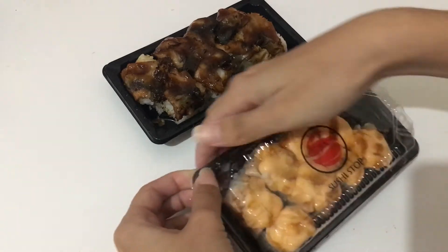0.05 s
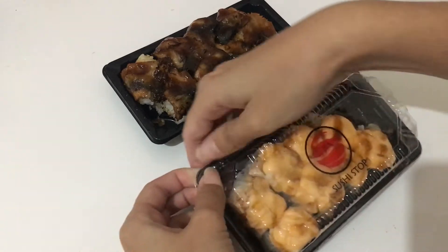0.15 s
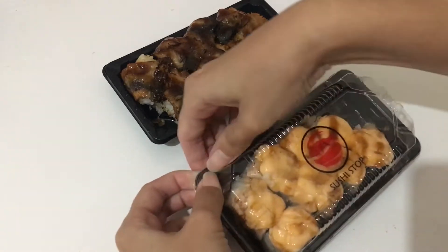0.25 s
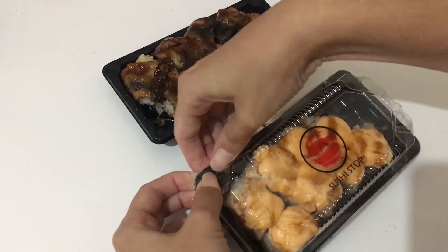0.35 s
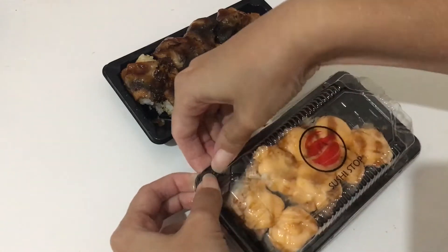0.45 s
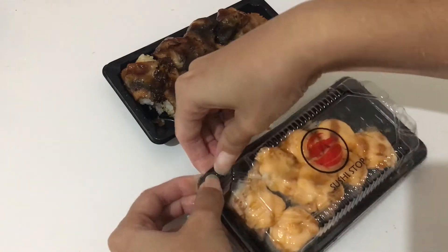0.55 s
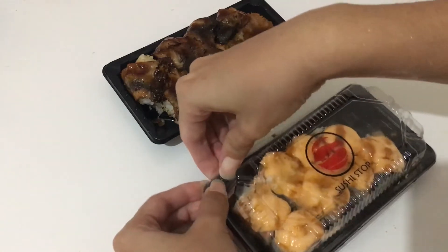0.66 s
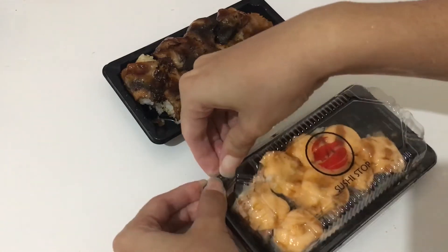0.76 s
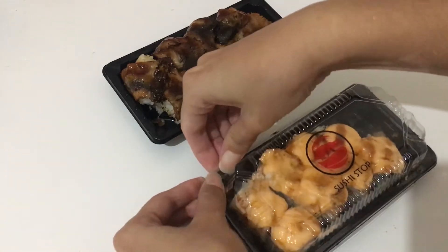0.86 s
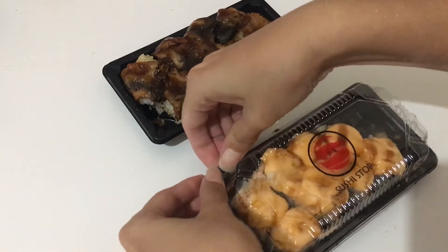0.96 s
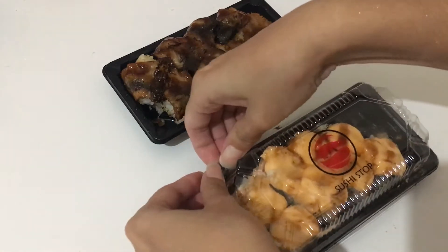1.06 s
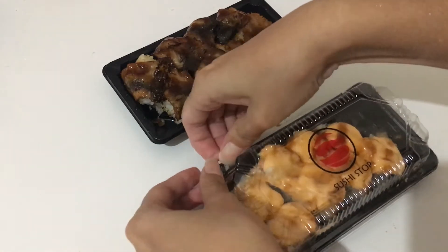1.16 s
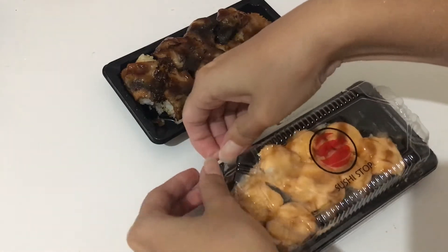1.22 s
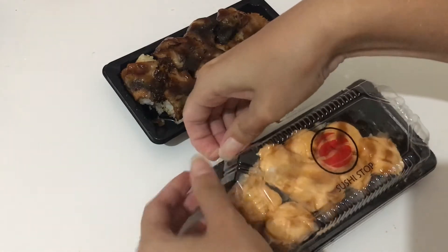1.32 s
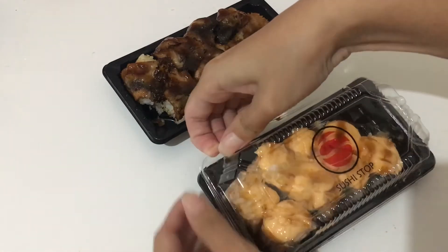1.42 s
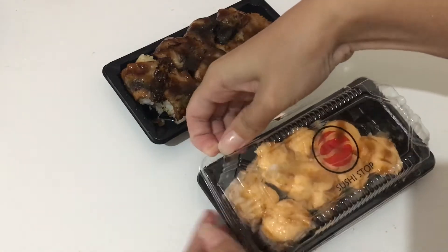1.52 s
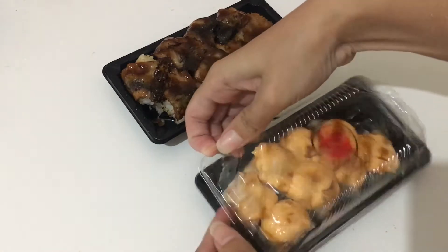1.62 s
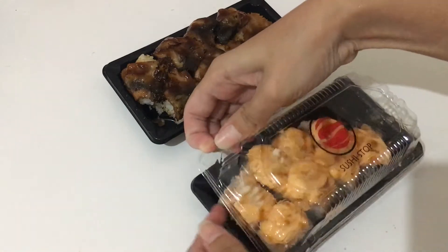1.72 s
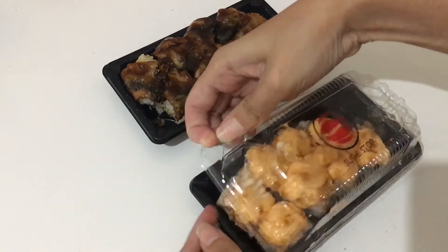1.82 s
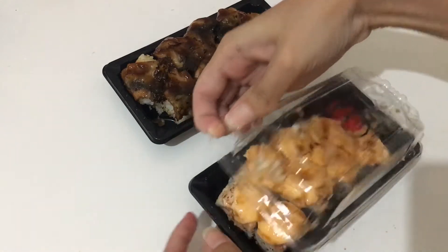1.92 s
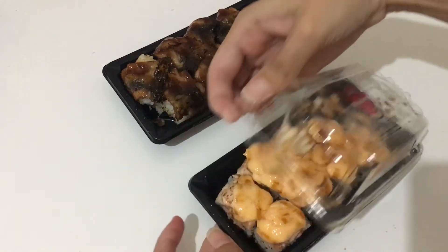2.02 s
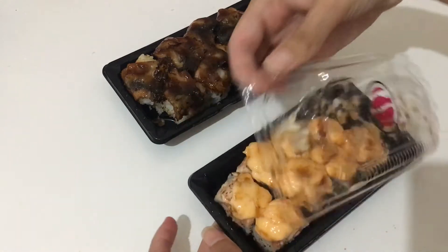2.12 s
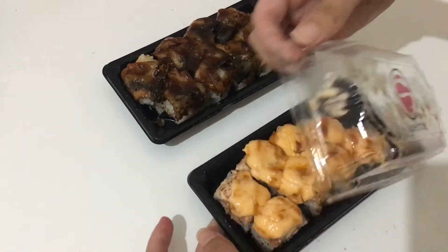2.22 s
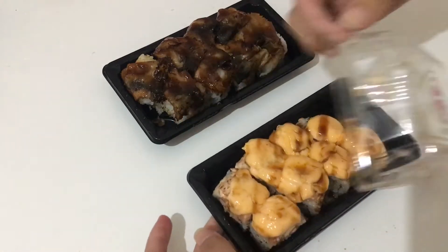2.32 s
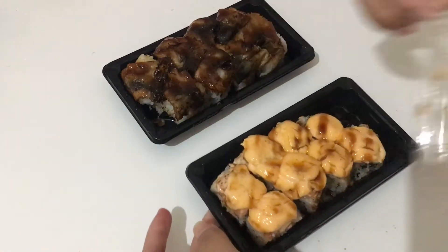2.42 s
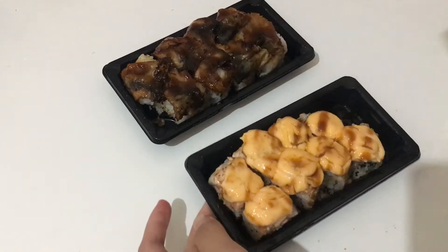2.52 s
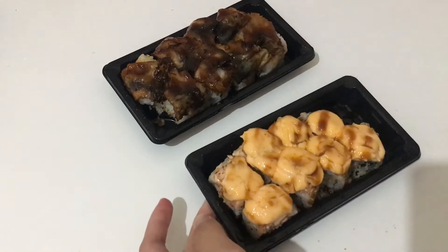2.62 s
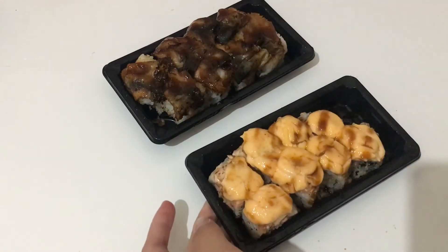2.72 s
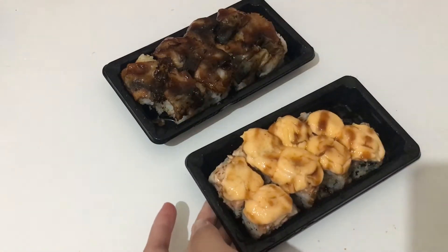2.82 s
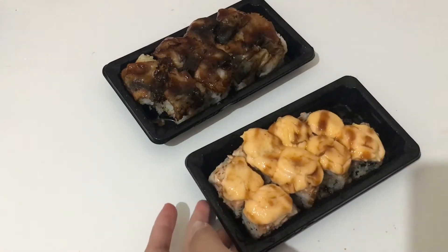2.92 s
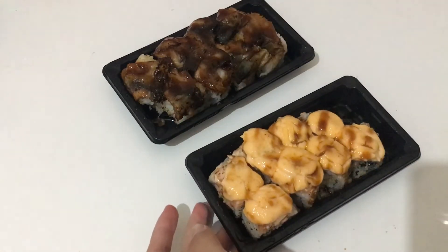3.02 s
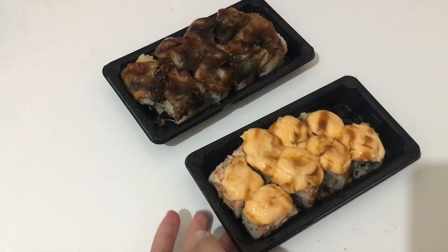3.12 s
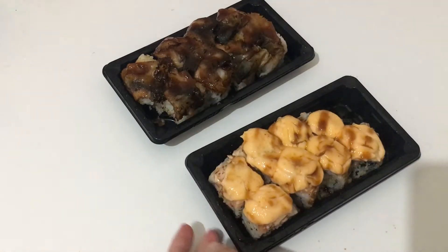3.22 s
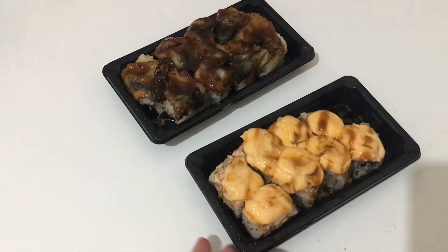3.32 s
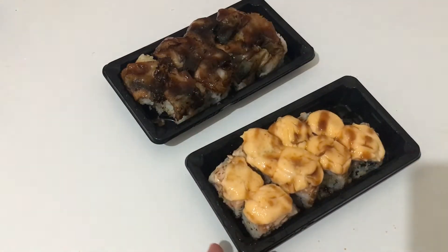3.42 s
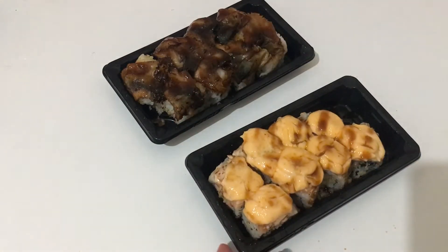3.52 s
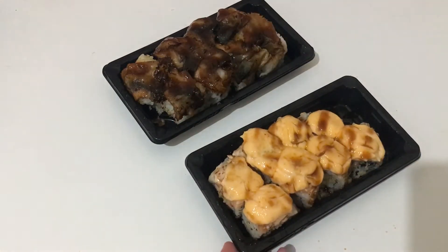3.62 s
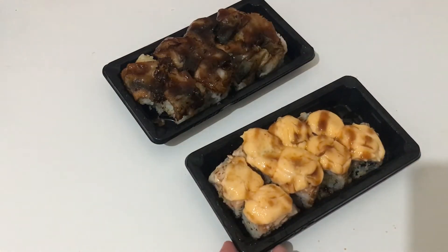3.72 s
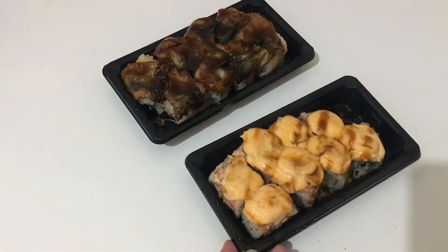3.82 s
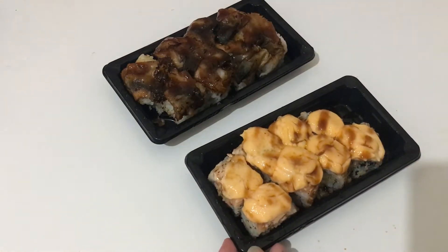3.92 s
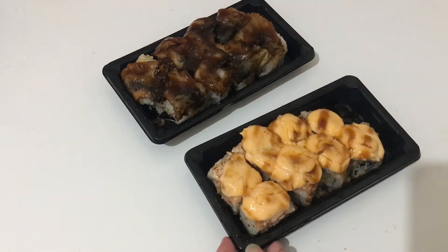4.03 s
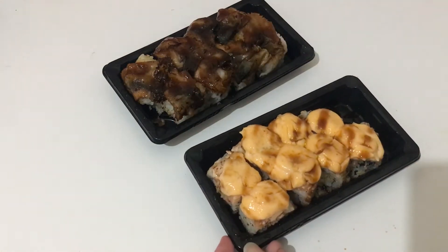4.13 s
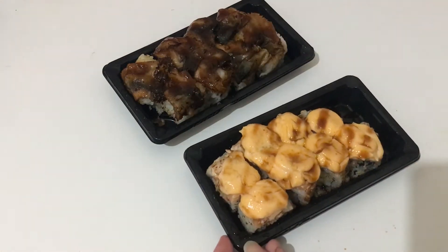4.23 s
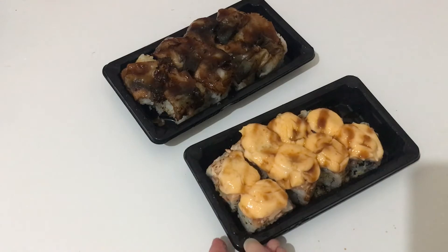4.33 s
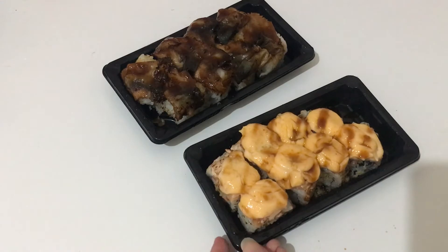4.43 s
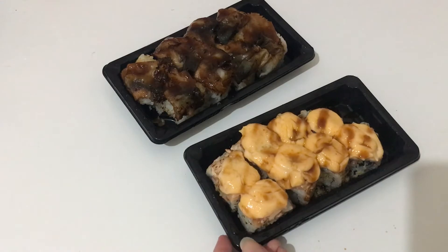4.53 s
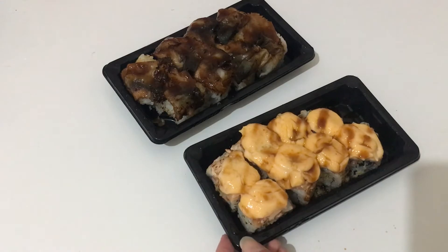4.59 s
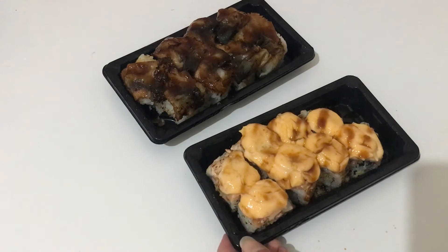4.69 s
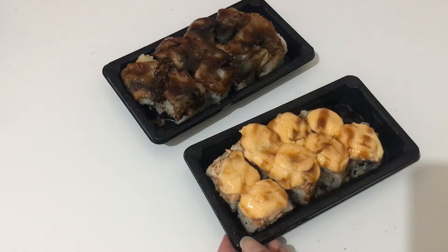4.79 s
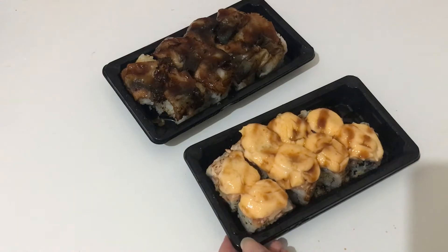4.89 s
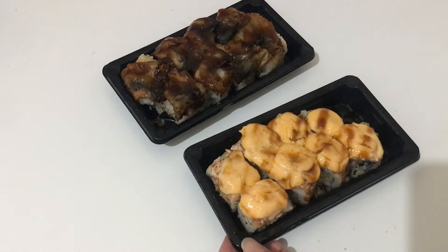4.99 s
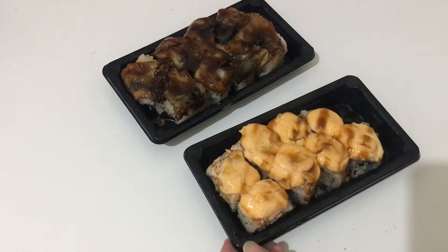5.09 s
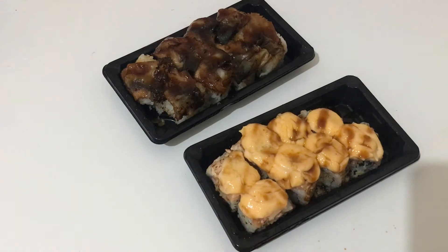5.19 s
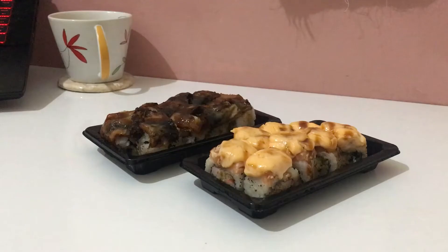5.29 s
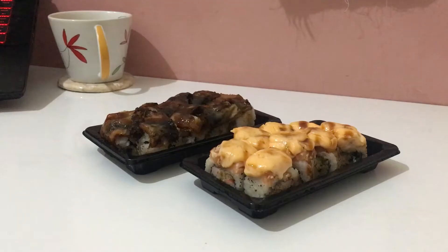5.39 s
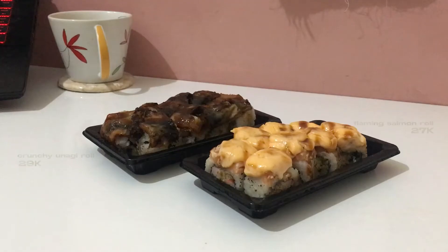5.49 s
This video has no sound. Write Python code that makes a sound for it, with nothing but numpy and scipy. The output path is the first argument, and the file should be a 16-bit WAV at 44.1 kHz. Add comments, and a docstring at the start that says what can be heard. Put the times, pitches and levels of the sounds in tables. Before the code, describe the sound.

A thin plastic lid is pried off a takeaway tray with a quick run of sharp crackles and snaps, then soft taps and rubs.

```python
"""A thin clear plastic lid is pried off a takeaway food tray on a table, close to the microphone in a small room.
Its rim snaps free catch by catch: noise bursts shaped by panel resonances, with rattles and table thuds.
Ticks, sliding rubs, crinkles and small squeaks come from the fingers and plastic; soft bumps pass through the table.
Scattering close by and a longer wall tail surround the contacts. A ventilation hum and air noise lie underneath."""
import sys
import numpy as np
from scipy import signal
from scipy.fft import rfft, irfft
from scipy.io import wavfile
from scipy.ndimage import uniform_filter1d

SR = 44100
rng = np.random.default_rng(int(sys.argv[2]) if len(sys.argv) > 2 else 0)


def wrap_up_sound(samples):
    """Save the sound to the file named by the first command line argument, as 16-bit audio."""
    columns = np.atleast_2d(samples).T
    # keep every value between -1 and 1, then stretch to whole-number steps
    tamed = np.clip(columns, -1, 1)
    steps = np.round(tamed * 32767).astype(np.int16)
    wavfile.write(sys.argv[1], SR, steps)


N = 244755  # samples in the scene
SIZE = 4096  # samples in an impulse response or a blow
FREQS = np.maximum(np.arange(SIZE // 2 + 1) * SR / SIZE, 1)  # Hz
TOP_HZ = 16300  # upper limit of the recorder


def undb(db):
    """Decibels to gain."""
    return 10 ** (np.asarray(db) / 20)


def curve(points):
    """Join (Hz, value) points on a log-frequency axis."""
    hz, value = np.transpose(points)
    return np.interp(np.log(FREQS), np.log(hz), value)


def response(db):
    """The causal, minimum-phase impulse response that has this gain curve."""
    cepstrum = irfft(np.log(undb(db)))
    cepstrum[1:SIZE // 2] *= 2
    cepstrum[SIZE // 2 + 1:] = 0
    return irfft(np.exp(rfft(cepstrum)))


def colour(x, db):
    """Pass a sound through a gain curve."""
    return signal.oaconvolve(x, response(db))[:N]


def fade(count, t60):
    """A free decay by 60 dB in t60 seconds."""
    return np.exp(-np.log(1000) * np.arange(count) / SR / t60)


def walk(rate):
    """Smooth random wandering with a spread of 1; rate is in new steps per second."""
    k = max(int(SR / rate), 1)
    steps = np.repeat(rng.standard_normal(N // k + 1), k)
    smooth = uniform_filter1d(uniform_filter1d(steps, k), k)[:N]
    return smooth / smooth.std()


def add(out, s, sound):
    """Mix a sound in at a time in seconds."""
    start = max(int(s * SR), 0)
    out[start:start + len(sound)] += sound[:max(N - start, 0)]


def stroke(s, length, taper):
    """Envelope of a contact that sets in and lets go softly."""
    out = np.zeros(N)
    add(out, s, signal.windows.tukey(max(int(length * SR), 2), min(taper, 1)))
    return out


# Air from the ventilation: columns f [Hz], level [dB], before the swell
AIR_TONE = [(25, -82), (33, -78), (45, -46.5), (90, -50.5), (200, -50.5), (450, -55), (750, -49.5),
            (1050, -50), (1500, -56.5), (2200, -63.5), (3300, -69.5), (6000, -78), (11000, -85.5),
            (16000, -92.5)]
# Slow swell of air and hum together: columns t [s], level [dB]
AIR_SWELL = [(0, 0.56), (2.5, 1), (3.5, -0.66), (5.5, -0.84)]
# Hum lines of the ventilation: columns f [Hz], rms level before waver and swell [dB], waver [dB]
HUM_LINES = [(45.6, -67.5, 1.1), (99, -73, 0.69), (175.6, -87.5, 1.1), (242, -81.5, 1.4), (314, -75.5, 2),
             (366.3, -78.5, 3.3)]


def ventilation(flutter_db=0.4):
    """Steady air noise with a few wavering hum lines, swelling slowly together."""
    t = np.arange(N) / SR
    air = colour(rng.standard_normal(N), curve(AIR_TONE)) * undb(flutter_db * walk(6))
    hum = np.zeros(N)
    for hz, db, waver_db in HUM_LINES:
        level = np.sqrt(2) * undb(db + waver_db * walk(2.4))
        hum += level * np.sin(2 * np.pi * hz * t + 1.7 * walk(3))  # the phase wanders too
    return (air + hum) * undb(np.interp(t, *np.transpose(AIR_SWELL)))


# Tone of the answer from the walls of the small room: columns f [Hz], level [dB]
WALL_TONE = [(100, -3), (400, -2), (1200, -4), (2300, -10), (5000, -11), (9000, -11.5), (15000, -18)]
# Ring of the walls: columns f [Hz], t60 [s]
WALL_RING = [(200, 0.45), (800, 0.26), (2000, 0.43), (5500, 0.32), (14000, 0.55)]


def room(direct, sent, near_db=-11, near_t60=0.04, near_delay=0.00065, wall_delay=0.0051):
    """Table and hands scatter the sound almost at once; the walls follow with a longer, frequency-dependent tail."""
    count = SR * 3 // 4
    t = np.arange(count) / SR
    noise = rfft(rng.standard_normal(count))
    hz = np.arange(count // 2 + 1) * SR / count
    octave = np.log2(np.clip(hz, 125, 16000) / 125)
    tail = np.zeros(count)
    for k in range(8):  # overlapping octave bands from 125 Hz up
        t60 = np.interp(125 * 2 ** k, *np.transpose(WALL_RING))
        shape = fade(count, t60) * np.clip(t / wall_delay - 1, 0, 1)
        band = irfft(noise * np.maximum(1 - np.abs(octave - k), 0), count)
        tail += band * shape / np.linalg.norm(shape)
    near = rng.standard_normal(count) * fade(count, near_t60) * (t > near_delay)
    near *= undb(near_db) / np.linalg.norm(near)
    walls = colour(tail, curve(WALL_TONE))[:count]
    return direct + signal.fftconvolve(sent, walls + near)[:N]


# Soft bumps of tray and hand through the table: columns t [s], length [s], level before the table's tone [dB]
TABLE_BUMPS = [(1.432, 0.05, -60), (1.685, .07, -48), (2.848, 0.29, -40), (5.149, 0.077, -46),
               (5.244, .32, -42.5)]


def bumps():
    """Tray and hand shift their weight and the table top rumbles faintly, as low-frequency noise."""
    weight = sum(undb(db) * stroke(s, length, taper=0.32) for s, length, db in TABLE_BUMPS)
    table_tone = curve([(20, -31), (50, 12), (90, 0), (200, -7.5), (500, -46), (2000, -76)])
    return colour(rng.standard_normal(N) * weight, table_tone)


# Tone that blows and rubs on the plastic share: columns f [Hz], level [dB]
PLASTIC_TONE = [(40, -10), (130, 0.5), (240, 1.5), (420, -0.5), (700, -1), (1100, -1), (1800, 0.5),
                (3300, -1), (4200, -1.5), (4800, -7.5), (5600, -3), (9000, -3), (12000, -4), (15300, -5),
                (16300, -14)]


def blow(db, t60, smooth_hz=350):
    """One blow on thin plastic: crowded modes die together, heard as a burst of decaying noise."""
    ring = rng.standard_normal(SIZE) * fade(SIZE, t60)
    # a short blow feeds all regions of the spectrum evenly; only the fine pattern is chance
    width = max(int(smooth_hz * SIZE / SR), 1)
    power = uniform_filter1d(np.abs(rfft(ring)) ** 2, width)
    return signal.fftconvolve(ring, response(db + curve(PLASTIC_TONE) - 10 * np.log10(power)))


BASS_HZ = 256  # where the bass level of a contact is set


def contact(db, bass_db, tilt_db, knee_hz):
    """Gain curve of a contact: its own bass level, and a treble tilted per octave above the knee."""
    bass = curve([(BASS_HZ, bass_db), (min(knee_hz, 1000), 0)])
    return db + bass + tilt_db * np.log2(np.maximum(FREQS / knee_hz, 1))


PUSH_S_PER_TILT = 0.00016  # build-up time constant, s per dB per octave of treble fall


def push(sound, tilt_db):
    """A hard contact starts at once; a softer, duller one builds up over a few milliseconds."""
    rise_s = PUSH_S_PER_TILT * max(-tilt_db, 0)
    pushed = sound * (1 - np.exp(-np.arange(1, len(sound) + 1) / max(rise_s * SR, 1)))
    return pushed * np.linalg.norm(sound) / np.linalg.norm(pushed)


PANEL_WIDTH = 0.11  # half width of a panel's resonance, as a share of its frequency
PANEL_OVERTONE, OVERTONE_SHARE = 2.5, 0.31  # second mode: frequency ratio, share of the lift


def panel(hz, lift_db):
    """Gain curve of a flexing panel: a broad resonance and its overtone."""
    lift = 0
    for ratio, share in [(1, 1), (PANEL_OVERTONE, OVERTONE_SHARE)]:
        lift = lift + share * lift_db / (1 + ((FREQS / (ratio * hz) - 1) / PANEL_WIDTH) ** 2)
    return lift


# The full tray thuds on the table: columns t [s], level added to the thud's tone [dB]
TABLE_THUDS = [(1.165, -16), (1.4402, -2.5), (1.671, -3), (1.7081, -10), (2.338, -8.5), (3.758, -17),
               (5.17, -16)]
# Tone of a thud: columns f [Hz], level [dB]
THUD_TONE = [(50, -10), (110, 2), (200, -0.5), (380, -7), (700, -17), (3000, -54)]


def thuds(t60=0.066):
    """The weight of the food meets the table under the heavier knocks: low bursts of decaying noise."""
    out = np.zeros(N)
    for s, db in TABLE_THUDS:
        add(out, s, blow(db + curve(THUD_TONE), t60))
    return out


RUB_ATTACK_SHARE, RUB_RELEASE_SHARE = 0.4, 0.76  # parts of a stroke that bear down and ease off; they overlap


def pressure(s, length):
    """How hard a sliding finger presses: a rise overlapping a slower release."""
    along = (np.arange(N) / SR - s) / length
    return np.clip(along / RUB_ATTACK_SHARE, 0, 1) * np.clip((1 - along) / RUB_RELEASE_SHARE, 0, 1)


# Skin and plastic sliding: columns t [s], length [s], body level [dB], body resonance f [Hz], hiss level [dB];
# levels are before the panel's lift and the plastic's tone
SLIDING_RUBS = [ (0, 0.036, -51, 1600, -57), (0.072, 0.11, -53, 1590, -56.5),
                (0.332, 0.77, -61.5, 1400, -72), (1.563, 0.067, -51, 1580, -56.5),
                (2.022, 0.037, -47, 1590, -65), (2.105, 0.058, -45, 1900, -68),
                (2.159, 0.034, -46, 1880, -44), (2.314, 0.11, -49, 1200, -55),
                (2.374, 0.11, -56.5, 1400, -55), (2.885, 0.064, -76.5, 1600, -61.5),
                (3.738, 0.078, -46.5, 750, -76), (3.91, 0.085, -48.5, 1480, -61),
                (4.067, 0.059, -44, 1880, -64.5), (4.724, 0.07, -58, 1610, -61),
                (4.748, 0.09, -51, 1610, -48.5), (4.73, 0.35, -58, 1594, -58),
                (4.885, 0.054, -54.5, 1800, -56), (4.92, 0.26, -57, 1260, -56)]


def rubs(grain_db=2.5, catch_db=1.0, flicker_db=2.8, low_db=-6, rasp_db=1.0, lift_db=5):
    """Sliding contact: dense tiny slips that stir now one region of the plastic's modes, now another."""
    slips = np.zeros(N)
    roughness_db = grain_db * walk(1500) + catch_db * walk(90)
    noise = rfft(rng.standard_normal(N) * undb(roughness_db), 2 ** 18)
    region = np.arange(len(noise)) * 24 // len(noise)  # 24 equal bands, each flickering by itself
    for k in np.unique(region):
        slips += irfft(noise * (region == k))[:N] * undb(flicker_db * walk(130))
    slips /= slips.std()
    out = np.zeros(N)
    for s, length, body_db, body_hz, hiss_db in SLIDING_RUBS:
        rasp = (5500, (body_db + hiss_db) / 2 + rasp_db)
        tone = curve([(body_hz / 4, body_db + low_db), (body_hz, body_db), rasp,
                      (10000, hiss_db), (16000, hiss_db - 4)])
        out += colour(slips * pressure(s, length), tone + panel(body_hz, lift_db) + curve(PLASTIC_TONE))
    return out


# A fingertip squeaks on the plastic: columns t [s], length [s], slip rate f [Hz], level [dB],
# overtones relative to the fundamental [dB], unsteadiness of the rate [share]
FINGER_SQUEAKS = [(0.15, 0.13, 2050, -85, 6, .01), (4.889, 0.02, 1900, -59, -11, .05),
                  (4.911, 0.013, 1718, -45.5, -19, .055), (4.947, 0.009, 1800, -53, -22, .05)]


def squeaks():
    """For a moment the slips fall into step and sing: an unsteady tone with three overtones."""
    out, wobble = np.zeros(N), walk(900)
    for s, length, hz, db, overtone_db, jitter in FINGER_SQUEAKS:
        phase = 2 * np.pi * np.cumsum(hz * (1 + jitter * wobble)) / SR
        overtones = np.sin(2 * phase) + np.sin(3 * phase) + np.sin(4 * phase) / 2
        tone = np.sin(phase) + undb(overtone_db) * overtones
        out += undb(db) * np.sqrt(2) * tone * stroke(s, length, taper=0.74)
    return out


# A dragging fingertip crinkles the thin wall: columns t [s], length [s], middle level [dB], pings per second [1/s]
WALL_CRINKLES = [(3.86, .11, -72, 300), (4.765, .06, -65, 800), (4.88, .24, -71.5, 600)]


def crinkles(scatter_db=4.0, low_hz=4200, high_hz=13000, ping_s=0.006):
    """Tiny creases give way at random moments, each with a brief high ping."""
    out = np.zeros(N)
    swell = signal.windows.hann(int(ping_s * SR))
    t = np.arange(len(swell)) / SR
    for start, length, db, rate in WALL_CRINKLES:
        for when, pitch, size in rng.random((int(rate * length), 3)):
            hz = low_hz * (high_hz / low_hz) ** pitch
            gain = undb(db + scatter_db * (2 * size - 1))
            add(out, start + length * when, gain * swell * np.sin(2 * np.pi * hz * t))
    return out


LID_OFF_S, CLAMPED_T60_S, OPEN_T60_S = 1.5, 0.016, 0.045  # the clamped tray rings briefly, the open one longer


def tick(s, db, tilt_db, low_db=-8, knee_hz=1800):
    """One small slip or tap: a short noise burst, mostly the hollow middle of the tray."""
    t60 = CLAMPED_T60_S if s < LID_OFF_S else OPEN_T60_S
    return push(blow(contact(db, low_db, tilt_db, knee_hz), t60), tilt_db)


# Clear ticks of fingers, rim and tray: columns t [s], level [dB], treble tilt [dB per octave]
CLEAR_TICKS = [ (0.144, -24, -4), (0.2392, -16, -3), (0.3595, -13, -5), (0.3789, -17, -9),
               (0.3905, -14.5, -8), (0.4219, -16, -21), (0.4425, -13.5, -9.5), (0.4599, -20, -6.5),
               (0.4682, -22.5, -7.5), (0.476, -23.5, -5.5), (0.4855, -17, -18), (0.493, -21, -10.5),
               (0.5367, -16.5, -8.5), (0.5625, -9.5, -11), (0.582, -21, -7), (0.598, -20, -13),
               (0.6061, -13, -9), (0.618, -18, -9.5), (0.649, -10, -10.5), (0.721, -10.5, -7),
               (2.4897, -30, -4), (2.655, -30, -5), (2.675, -26, -4), (2.715, -29, -6.5), (2.779, -37, -4),
               (3.0609, -29.5, 0), (3.7888, -16, -5.5), (3.869, -28.5, -1.5), (3.946, -24, -5),
               (4.108, -18, -4.5), (4.178, -29.5, -4), (4.284, -19, -8), (4.344, -27.5, -9),
               (4.82, -21.5, -2), (5.132, -24.5, -3.5), (5.1712, -12, -6)]
# Strained or settling plastic crackles faintly: columns t [s], length [s], middle level [dB],
# treble tilt [dB per octave]
FAINT_CRACKLES = [(0.301, 0.22, -30.5, -11), (2.46, 0.26, -44, -5.5), (3.797, 0.19, -36.5, -6.5)]


def ticks(scatter_db=6.5, count=36):
    """The clear ticks, and runs of fainter ones at uneven moments and strengths."""
    out = np.zeros(N)
    for s, db, tilt_db in CLEAR_TICKS:
        add(out, s, tick(s, db, tilt_db))
    for start, length, db, tilt_db in FAINT_CRACKLES:
        for k in range(count):
            s = start + length * (k + rng.random()) / count
            add(out, s, tick(s, db + scatter_db * rng.standard_normal(), tilt_db))
    return out


# The loosened lid chatters against the tray: columns t [s], length [s], starting level [dB],
# middle panel resonance f [Hz]
LID_RATTLES = [(0.294, 0.06, -22.5, 1980), (1.189, 0.094, -19, 1250), (1.448, 0.024, -18.5, 1300),
               (1.725, 0.04, -23, 1110), (1.922, 0.035, -21, 595), (2.203, 0.05, -23.5, 3600),
               (3.64, 0.043, -20.5, 1430)]


def rattles(scatter_db=2.0, detune=0.19, count=8, fall_db=5.5, lift_db=7, tilt_db=-16, t60=0.011):
    """Uneven, fading bounces; the panel flexes between them, so each rings at its own pitch."""
    out = np.zeros(N)
    for start, length, db, hz in LID_RATTLES:
        for k in range(count):
            along = (k + rng.random()) / count
            size_db = db - fall_db * along + scatter_db * rng.standard_normal()
            ring = panel(hz * np.exp(detune * rng.standard_normal()), lift_db)
            bounce = blow(contact(size_db, TAUT_BASS_DB, tilt_db, hz) + ring, t60)
            add(out, start + length * along, bounce)
    return out


MODE_WIDTH_HZ, MODE_WIDTH_SHARE = 70, 0.035  # half width of a mode: a base plus a share of its frequency


def bent(modes):
    """Gain curve of the lid's narrow modes, which shift each time it is bent into a new shape."""
    return sum(db / (1 + ((FREQS - hz) / (MODE_WIDTH_HZ + MODE_WIDTH_SHARE * hz)) ** 2) for hz, db in modes)


SLIP_GAP_S, SLIP_GAP_S_PER_S = 0.000507, 0.00023  # the gap widens as the rim works loose


def double_slip(s, second, blur_hz=24000):
    """A second slip about a millisecond later combs the spectrum and gives a snap its pitch; gain in dB."""
    gap_s = SLIP_GAP_S + SLIP_GAP_S_PER_S * s
    echo = min(second, 0.9) * np.exp(-2j * np.pi * FREQS * gap_s - (FREQS / blur_hz) ** 2)
    return 20 * np.log10(np.abs(1 + echo) / np.hypot(1, second))


# A taut rim gives a short thin crack; the slacker the lid, the longer it rings and the more bass it moves
TAUT_T60_S, TAUT_BASS_DB, BASS_DB_PER_DOUBLING = 0.013, -15.5, 7.5
KNEE_HZ = 1280  # the treble tilt of a snap starts here
# Snaps and knocks of lid and tray: columns t [s], level [dB], treble tilt [dB per octave], t60 [s],
# panel resonance f [Hz], its lift [dB], size of a second slip [0-1]; then, for the clear ones,
# narrow modes of the bent lid as pairs f [Hz], lift [dB] (negative where the shape cancels)
RIM_SNAPS = [ (0.2832, -18, 5.5, 0.003, 11400, 9.5, 0.1), (0.2835, 2, -9.5, 0.012, 1906, 8.5, 0, (690, 4),
             (920, 5), (1330, 3), (2570, 8), (3218, 8), (5352, 15)), (0.2858, -21, 3.5, 0.007, 11000, 9, 0),
             (0.6665, -1.8, 0.6, 0.017, 2440, 15.5, 0, (1360, 4), (1770, 6), (2040, -8), (4700, -3),
             (5831, 4.5), (6878, 6), (7900, -12), (8900, 7.5), (10628, 5)),
             (0.8849, -4.2, 2.4, 0.014, 3949, 11.5, 0.3, (1326, 8.4), (1640, 7), (2624, 5), (3276, 8.5),
             (6450, -6), (7724, 2), (8545, 5), (10200, -4), (11400, 3), (12500, -3), (14800, 4)),
             (1.1630, 2.5, -7.3, 0.012, 1200, 6, 0.05, (943, 4.5), (1640, 5), (2270, 3.9), (3911, 2.5),
             (8678, 5)), (1.1757, -5, -6.8, 0.017, 1550, 8, 0), (1.3732, -8, -11, 0.019, 1350, 6.5, 0.1),
             (1.4403, -1.3, -8, 0.018, 1345, 5, 0, (812, 3), (1979, 5), (3448, 4), (5296, 5), (6610, 5)),
             (1.672, -4, -6, 0.019, 1380, 5.5, .3), (1.6765, 0, -6, 0.021, 1065, 5, 0.06),
             (1.6875, -8.5, -9.5, 0.041, 1250, 9, 0), (1.7021, -7.5, -8.5, 0.038, 1420, 3, 0),
             (1.7088, -7, -10.5, 0.031, 500, 17, 0), (1.7187, -12, -16, 0.046, 1510, 0, 0),
             (1.917, -6, -12, 0.026, 775, 5, 0), (1.9351, -8.5, -11.5, 0.026, 2150, 9, 0),
             (1.9592, -4.5, -15, 0.02, 2940, 14.5, 0), (2.1208, -16, -5.5, 0.054, 2890, 14, 0.1, (1950, 11),
             (2400, -5)), (2.1845, -3.5, -1.9, 0.011, 1860, 18, 0, (1085, 3), (2080, 3), (2400, -5),
             (3321, 4), (4000, 4), (6617, 6), (8000, 5)),
             (2.1891, -8, -3, 0.014, 3400, 15, 0.13, (1400, 5)), (2.1982, -20, -9, 0.017, 1560, 24, 0),
             (2.3377, -4.5, -6.5, 0.03, 1960, 6, 0.15), (3.6337, -13.5, -6.5, 0.031, 1510, 6, 0.14),
             (3.741, -14, -4.5, 0.054, 1400, 5, 0.2), (3.7617, -11.5, -8.5, 0.03, 800, 10.5, 0.1),
             (3.772, -13.5, -7, 0.052, 570, 7, 0.04)]


def snaps(spread=0.61, even_hz=170):
    """The rim jumps its catches and panels buckle; gives the sound at the microphone and that sent to the room."""
    at_microphone, sent = np.zeros((2, N))
    for s, db, tilt_db, t60, panel_hz, lift_db, second, *modes in RIM_SNAPS:
        bass_db = TAUT_BASS_DB + BASS_DB_PER_DOUBLING * np.log2(max(t60 / TAUT_T60_S, 1))
        tone = contact(db, bass_db, tilt_db, KNEE_HZ) + double_slip(s, second) + bent(modes)
        snap = push(blow(tone, t60, even_hz), tilt_db)
        # the moving panel beams its resonance at the microphone; the walls get less of it
        add(at_microphone, s, colour(snap, panel(panel_hz, lift_db)))
        add(sent, s, colour(snap, panel(panel_hz, spread * lift_db)))
    return np.array([at_microphone, sent])


def scene():
    """Lid, tray and fingers close up in the small room, over the bumps and the ventilation."""
    fingers = ticks() + rubs() + crinkles() + squeaks()
    direct, sent = snaps() + rattles() + thuds() + fingers
    return (ventilation() + bumps() + room(direct, sent))[None]


def record(dry):
    """The recorder cuts the top with a steep low-pass."""
    return signal.sosfilt(signal.ellip(8, 0.2, 70, TOP_HZ, fs=SR, output="sos"), dry)


dry = scene()
out = record(dry)
wrap_up_sound(out)
```